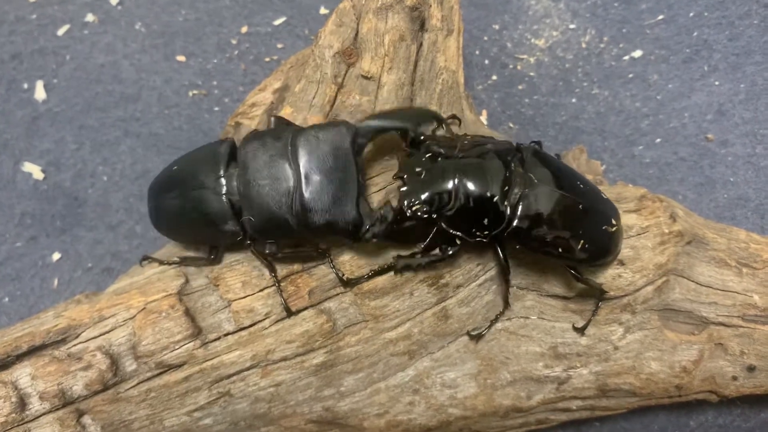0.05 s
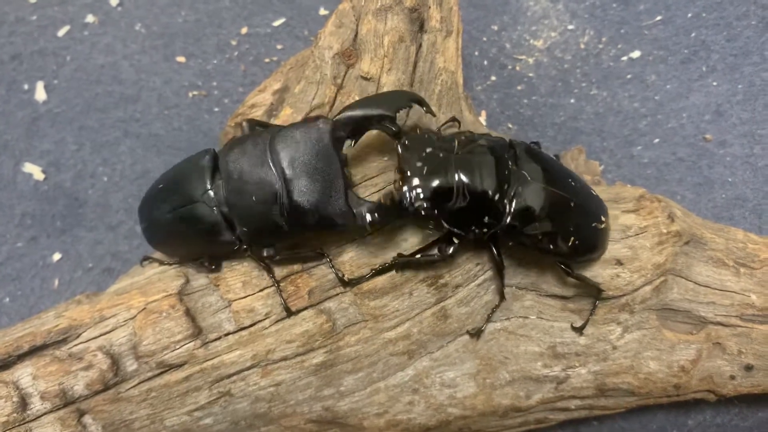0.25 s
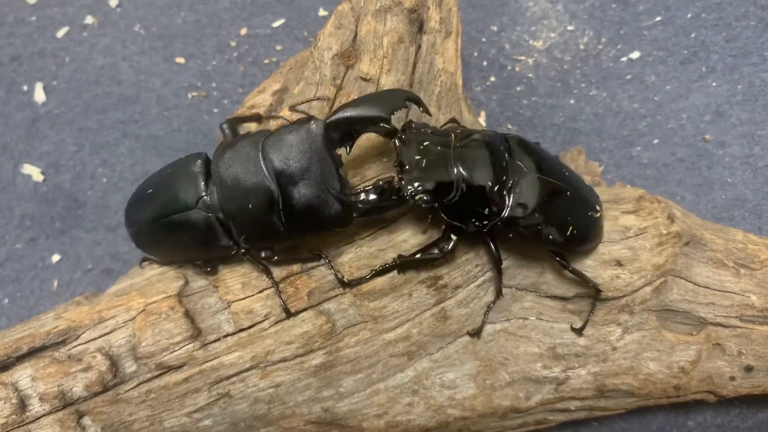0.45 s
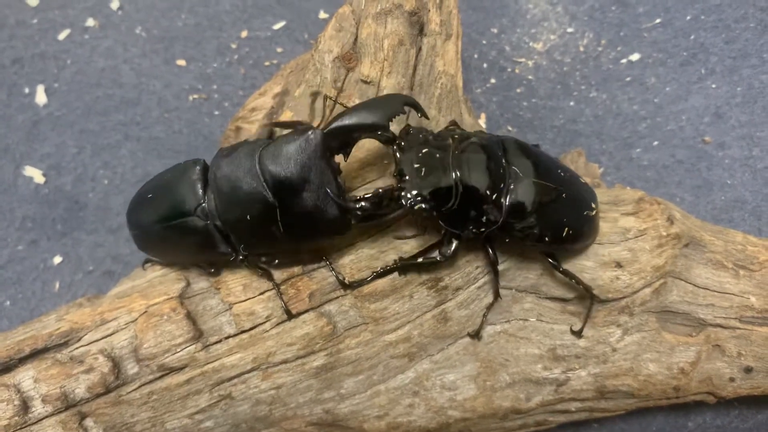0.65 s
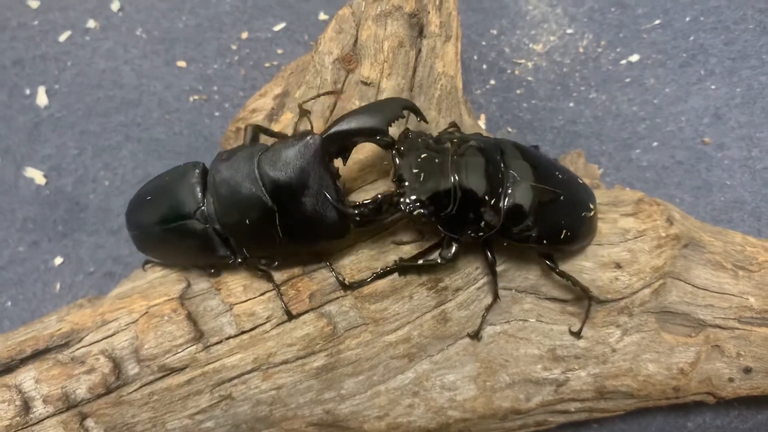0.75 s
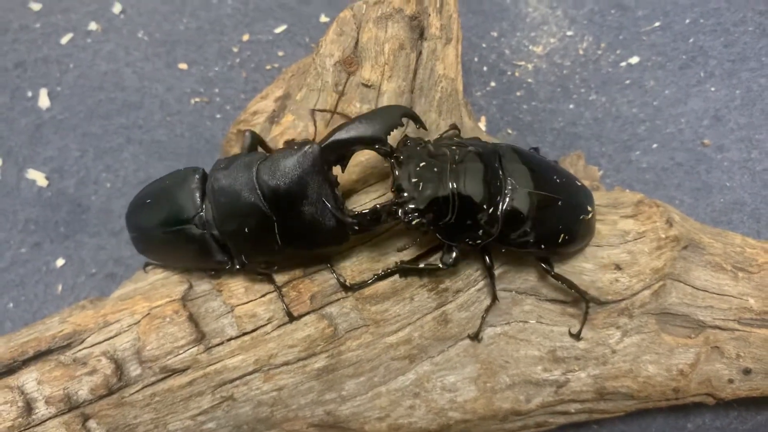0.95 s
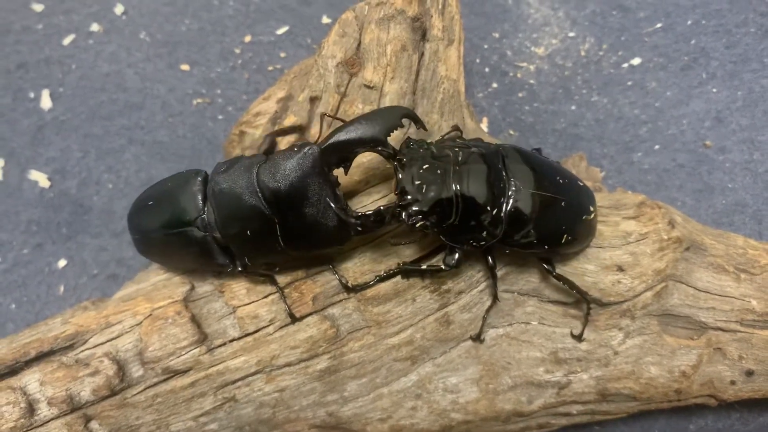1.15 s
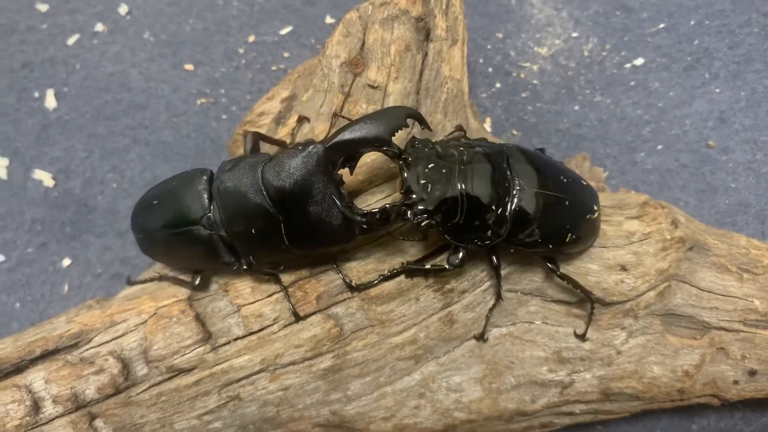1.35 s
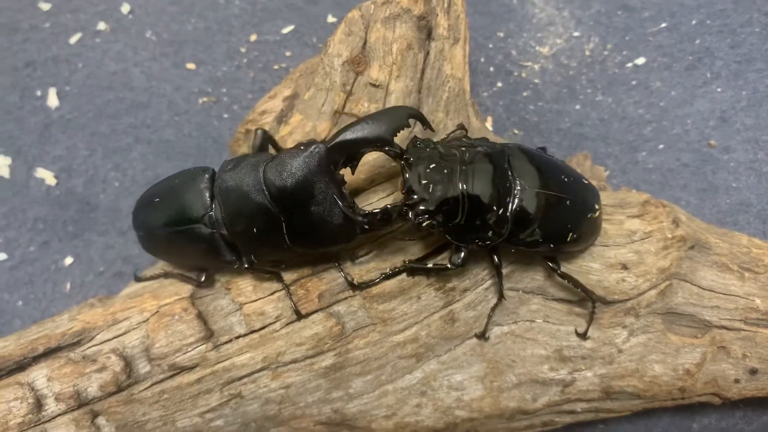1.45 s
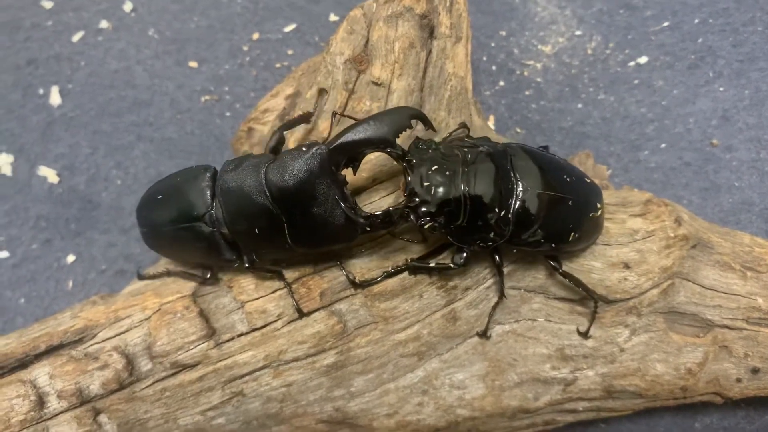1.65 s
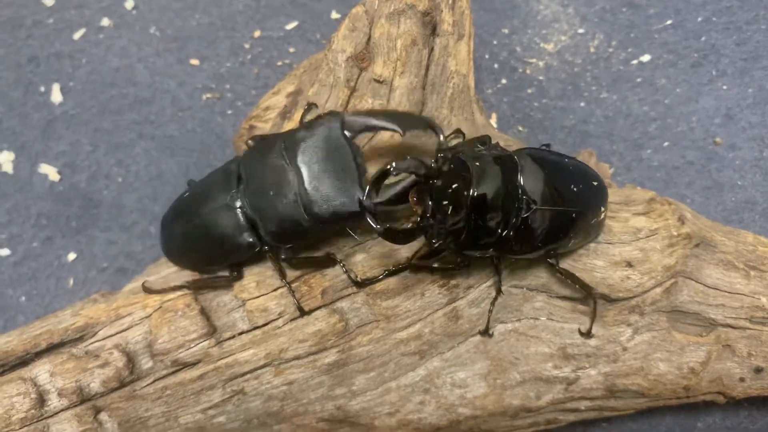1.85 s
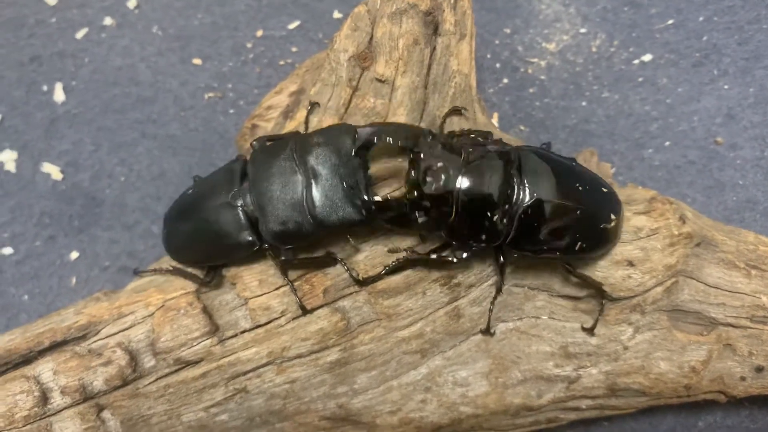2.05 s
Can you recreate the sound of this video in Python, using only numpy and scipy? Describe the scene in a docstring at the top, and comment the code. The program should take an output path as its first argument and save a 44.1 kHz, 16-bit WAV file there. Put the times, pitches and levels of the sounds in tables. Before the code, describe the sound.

Bright brittle beetle clicks, a quick crackling burst, then scattered snaps in a quiet room

```python
"""Two beetles wrestle on dry wood close to a phone in a small quiet room, over low rumble, faint hum and hiss.
Sparse clicks and claw scrapes thicken into a dense bright burst from 0.3 to 0.6 s, then come loud single clicks.
Clusters follow near 1.1 and 1.7 s, with soft thumps at 1.0, 1.5 and 1.7 s; the last clicks fade by 1.9 s.
Rough noise blows ring wood and shell modes, random ticks make the scrapes, and decaying noise makes the echoes.
Floor modes make the thumps; filtered noise makes rumble, hum and hiss."""
import sys
import numpy as np
from scipy import signal
from scipy.fft import rfft, irfft, next_fast_len
from scipy.io import wavfile

SR = 44100
rng = np.random.default_rng(int(sys.argv[2]) if len(sys.argv) > 2 else 0)


def bounce(signal):
    """Save signal as a 16-bit WAV file at the path given by the first command-line argument."""
    frames = np.transpose(np.atleast_2d(signal))
    limited = np.clip(frames, -1, 1)
    pcm = np.round(limited * 32767).astype(np.int16)
    wavfile.write(sys.argv[1], SR, pcm)


N = 92610  # 2.1 s


def undb(db):
    """Amplitude factor of a level in dB."""
    return 10 ** (np.asarray(db) / 20)


def unit(x):
    """Scale to energy 1."""
    return x / np.sqrt(np.sum(x ** 2))


def ring(modes, seconds):
    """Sum of decaying modes, band-limited to their range; energy 1."""
    t = np.arange(int(seconds * SR)) / SR
    y = np.zeros(len(t))
    for hz, db, t60 in modes:
        decay = 1000. ** (-t / t60)
        y += undb(db) / np.sqrt(t60) * np.sin(2 * np.pi * hz * t) * decay
    edges = [.8 * modes[0][0], 1.2 * modes[-1][0]]
    return unit(signal.sosfilt(signal.butter(3, edges, "band", fs=SR, output="sos"), y))


def through(x, response):
    """Let a sound pass through a response, cut to the scene's length."""
    return signal.fftconvolve(x, response)[:N]


def band(hz, width_hz, size=N):
    """Noise passed twice through a resonance at hz, rms 1."""
    b, a = signal.iirpeak(hz, hz / width_hz, SR)
    once = signal.lfilter(b, a, rng.standard_normal(size + SR))
    settled = signal.lfilter(b, a, once)[SR:]
    return settled / settled.std()


def hiss():
    """Coloured noise, alike in both ports in the bass and growing unlike towards the treble."""
    level_db, alike_hz = -73, 785  # the level is the rms of the shared part
    # colour of the hiss: f/Hz, relative level/dB
    hiss_colour = [(47, -31), (80, -12), (349, -26), (521, -30), (680, -34), (930, -27), (1060, -44),
                   (1270, -29.5), (1450, -33.5), (11300, -55), (16500, -58)]
    points_hz, points_db = np.array(hiss_colour).T
    hz = np.maximum(np.arange(N // 2 + 1) * SR / N, 1)
    colour = undb(np.interp(np.log(hz), np.log(points_hz), points_db)) * (hz > 80)
    mid, side = (rfft(rng.standard_normal(N)) * colour for _ in range(2))
    mid = irfft(mid, N)
    side = irfft(side * hz / np.hypot(hz, alike_hz), N)
    return undb(level_db) / mid.std() * np.array([mid + side, mid - side])


def hum():
    """A faint narrow band of noise."""
    return undb(-73) * band(171.4, 14)


def rumble():
    """Bands of deep noise whose common level wanders; a shared part and a weaker opposed part."""
    # wandering level, before the band levels: t/s, level/dB
    rumble_level = [(0, -72), (.2, -67), (.6, -67), (.75, -100), (1., -69), (1.3, -61), (1.9, -64),
                    (1.96, -77), (2.1, -58.5)]
    # resonances: f/Hz, width of one filter pass/Hz, relative level/dB
    rumble_bands = [(44, 25, -0.5), (65, 18, 3.5)]
    t = np.arange(N) / SR
    curve = undb(np.interp(t, *np.array(rumble_level).T))
    mid, side = (curve * sum(undb(db - 3.5) * band(hz, width) for hz, width, db in rumble_bands)
                 for _ in range(2))
    side *= undb(-8.5)
    return np.array([mid + side, mid - side])


def thumps():
    """Soft pushes through the floor set its low modes ringing."""
    # pushes: t/s, relative level/dB
    floor_pushes = [(1.032, -43), (1.542, -42), (1.74, -55.5)]
    # floor modes: f/Hz, relative level/dB, t60/s
    floor_modes = [(44, -0.5, 1.), (61.97, 1.5, 0.593), (78, -5, 0.1), (122.4, -9, .4), (197, -14, 0.36)]
    push_s = .003
    t = np.arange(N) / SR
    push = np.zeros(N)
    for start, db in floor_pushes:
        push += undb(db) * np.exp(-((t - start) / push_s) ** 2)
    floor = ring(floor_modes, 0.88)
    return through(push, floor / np.abs(floor).max()) / (push_s * SR)


def background():
    """Thumps and hum equal in both ports, under stereo rumble and hiss."""
    return thumps() + hum() + rumble() + hiss()


def near_echoes(t, shared):
    """Direct sound, then dense decaying echoes from wood and table, mostly unlike between the ports."""
    level_db, t60_s, delay_s, unlike = -15, 0.02, 0.00089, 4.5  # energy level against the direct sound
    noise = shared + unlike * rng.standard_normal(len(t))
    echo = noise * (t > delay_s) * 1000. ** (-t / t60_s)
    return (t == 0) + undb(level_db) * unit(echo)


def walls(t):
    """Bands of decaying noise that set in after a gap, strongest at first as the walls slap back."""
    # wall tail: f/Hz, relative level/dB, t60/s
    room_bands = [(540, -27, 0.15), (1274, -30.5, 0.25), (2110, -21, 0.24), (3990, -22, 0.22),
                  (6140, -26.5, 0.2), (9700, -33, .28), (14200, -31, 0.13)]
    delay_s, rise_s = .012, 0.0013
    slap_db, slap_s = 7, .006  # early slap added to the tail
    u = np.maximum(t - delay_s, 0)
    onset = (1 - np.exp(-u / rise_s)) * (1 + undb(slap_db) * np.exp(-u / slap_s))
    tail = np.zeros(len(t))
    for hz, db, t60 in room_bands:
        decay = 1000. ** (-u / t60) / np.sqrt(t60 * SR / 20)
        tail += undb(db) * band(hz, hz * 0.32, size=len(t)) * onset * decay
    return tail


def surroundings():
    """Response from beetles to each port: direct sound, close echoes and walls."""
    t = np.arange(SR // 2) / SR
    shared = rng.standard_normal(len(t))
    return [near_echoes(t, shared) + walls(t) for _ in range(2)]


def ports(x):
    """The phone's pair of ports differ in phase and level along the spectrum."""
    # phase: f/Hz, lead of left over right/rad
    port_phase = [(0, 0), (1400, 1.4), (2300, 3.4), (3360, 3.5), (6250, 14.3), (7000, 16.9), (8500, 15.8),
                  (16000, 6.2), (22050, -1)]
    # balance: f/Hz, level of left over right/dB
    port_balance = [(0, 1), (300, 1), (800, 9), (1150, 9.5), (1500, 1), (2500, -1), (6000, -3.5),
                    (6600, .5), (22050, 0)]
    n = next_fast_len(N + 512)
    hz = np.arange(n // 2 + 1) * SR / n
    balance = undb(np.interp(hz, *np.array(port_balance).T))
    phase = np.interp(hz, *np.array(port_phase).T)
    half = np.sqrt(balance) * np.exp(.5j * phase)  # each port takes half the difference
    return [irfft(rfft(x, n) * g, n)[:N] for g in (half, 1 / half)]


def part_rings():
    """Ringing of the five parts: low wood, high wood, shell body, shell edge, shell top."""
    # modes of each part: f/Hz, relative level/dB, t60/s
    wood_low = [(305.6, -10.5, 0.01), (450, 0.5, .015), (670, 5.5, .012), (770, 12, .012)]
    wood_high = [(1296, 0.02, 0.0058), (1824, 0.044, 0.017)]
    shell_body = [(2870, -23, .004), (3500, 14.5, .004), (4750, 18, 0.0036), (5700, 8, 0.0014)]
    shell_edge = [(7645, -2.8, 0.0029), (8370, 0, .002), (8850, -0.93, .002), (10074, -1.7, .002)]
    shell_top = [(11580, -2.7, .002), (13300, 0.019, .0015), (14700, 0.0085, .002)]
    return [ring(modes, .03) for modes in (wood_low, wood_high, shell_body, shell_edge, shell_top)]


def scrapes(rings):
    """Dense uneven ticks of dragging claws ring the shells and, more weakly, the wood."""
    # drags: start t/s, length/s, relative level/dB
    claw_drags = [(.005, 0.025, -52), (0.148, 0.01, -38), (0.189, 0.014, -37.5), (0.2, 0.12, -48.5),
                  (0.293, .13, -48.5), (1.113, 0.068, -41), (1.842, 0.033, -70)]
    ticks_per_s, scatter_db = 1200, 4
    ticks = (rng.random(N) < ticks_per_s / SR) * undb(scatter_db * rng.exponential(size=N))
    ticks *= rng.choice([-1, 1], N)
    t = np.arange(N) / SR
    drag = np.zeros(N)
    for start, length, db in claw_drags:
        drag += undb(db) * np.sin(np.pi * np.clip((t - start) / length, 0, 1))
    shares = undb([-17, -17, -4, 0, -5])  # wood low and high, shell body, edge, top
    return np.array([g * through(ticks * drag, r) for g, r in zip(shares, rings)])


def clicks(rings):
    """Jaws and shells slip and knock: each short rough blow rings the five parts in its own mix."""
    # clicks: t/s, shell edge energy level/dB, then level against the edge/dB of
    # wood thud, wood knock, shell body, top snap
    click_rows = [(0.021, -28, -17, -12, -6, -5), (0.0288, -24, -16, -16, -6, 0),
                  (0.0432, -31, -16, -3, -2, -5), (0.083, -38, -6, 2, 4, -13),
                  (0.1557, -22, -16, -20, -4, -6), (0.2002, -29, -8, -4, -2, 0),
                  (0.2275, -12, -22, -25, -5, -3), (0.2908, -39, -15, -12, -2, -12),
                  (0.3044, -30, -23, -25, -6, -11), (0.3159, -26, -21, -20, -8, -8),
                  (0.3188, -34, -14, -8, -3, -9), (0.3329, -16, -25, -22, -12, -3),
                  (0.336, -22, -24, -25, -8, -6), (0.3467, -12, -23, -22, -10, -5),
                  (0.3551, -15, -35, -28, -13, -6), (0.3621, -11, -32, -17, -12, -2),
                  (0.3644, -21, -21, -11, -6, 0), (0.3688, -22, -18, -14, -9, 0),
                  (0.3745, -10, -34, -22, -14, -2), (0.3882, -10, -26, -15, -6, -2),
                  (0.3929, -16, -23, -11, -1, 1), (0.3991, -21, -24, -15, -16, 4),
                  (0.41, -2, -40, -25, -13, -6), (0.4199, -8, -35, -25, -14, 0),
                  (0.4375, -6, -24, -22, -12, 4), (0.4397, -1, -23, -27, -11, 4),
                  (0.4562, -8, -30, -24, -11, -1), (0.4818, -4, -28, -18, -12, -1),
                  (0.499, -6, -36, -26, -14, -9), (0.5384, -5, -34, -24, -9, 0),
                  (0.5665, -29, -15, 1, 2, -11), (0.6326, 1, -29, -22, -10, 0),
                  (0.8313, 2, -40, -29, -16, -1), (0.8935, -27, -19, -6, -10, -6),
                  (0.9365, -38, -16, -1, -6, -12), (1.0107, -1, -42, -30, -16, 0),
                  (1.1088, -15, -28, -11, -4, -1), (1.1253, 1, -33, -19, -15, -1),
                  (1.1408, -8, -23, -16, -12, 0), (1.1479, -16, -30, -16, -9, -4),
                  (1.1638, -19, -32, -10, -8, 0), (1.252, -38, -11, -5, -5, -3),
                  (1.2985, -3, -36, -29, -11, -4), (1.67, -31, -15, -12, -10, -6),
                  (1.6767, -8, -23, -14, -7, -3), (1.6909, -7, -21, -13, -7, 3),
                  (1.6979, -10, -28, -17, -11, -5), (1.6992, 0, -28, -20, -13, 1),
                  (1.7101, 0, -13, -17, -12, 2), (1.8385, -55, 0, 3, 12, -3),
                  (1.8541, -28, -34, -18, -7, -3), (1.8728, -37, -18, -16, -3, -2),
                  (1.9073, -52, -9, 3, 17, -12)]
    # delay of each part after the click time/s: wood and shell body speak a little late
    part_lags = [0.0024, 0.00017, 0.00021, 0, 0]
    contact_s, chatter_db, chatter_s = .00007, -22, 0.0037
    out = np.zeros((5, N + SR))
    t = np.arange(300) / SR
    contact = t / contact_s * np.exp(1 - t / contact_s)
    shape = contact + undb(chatter_db) * np.exp(-t / chatter_s)
    for start, edge_db, thud, knock, body, top in click_rows:
        for part, relative_db in enumerate((thud, knock, body, 0, top)):
            blow = rng.standard_normal(len(t)) * shape
            y = np.convolve(blow, rings[part])
            i = int((start + part_lags[part]) * SR)
            out[part, i:i + len(y)] += undb(edge_db + relative_db) * unit(y)
    return out[:, :N]


def beetles():
    """Clicks and scrapes at the two ports, with the echoes and the room."""
    rings = part_rings()
    close = np.sum(clicks(rings) + scrapes(rings), axis=0)
    return np.array([through(x, response) for x, response in zip(ports(close), surroundings())])


def scene():
    """The beetles over the quiet room."""
    return background() + beetles()


def record(dry):
    """The phone's microphone rolls off the top, and a steeper filter then cuts it."""
    soft = signal.sosfilt(signal.butter(10, 16200, fs=SR, output="sos"), dry)
    return signal.sosfilt(signal.ellip(8, .2, 70, 17000, fs=SR, output="sos"), soft)


dry = scene()
out = record(dry)
bounce(out)
```